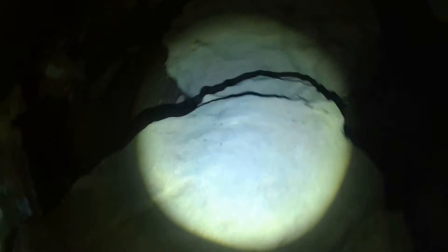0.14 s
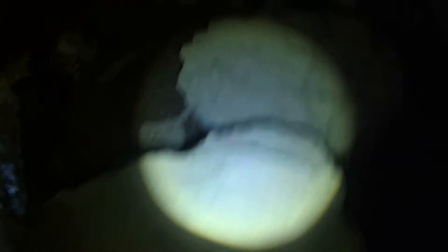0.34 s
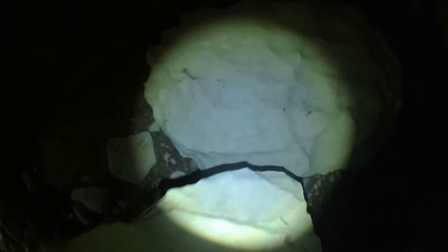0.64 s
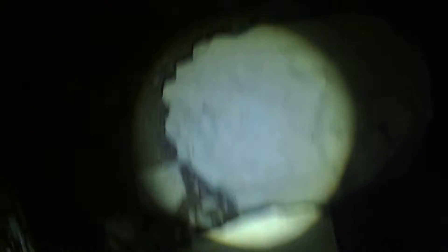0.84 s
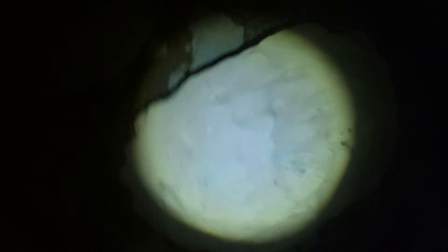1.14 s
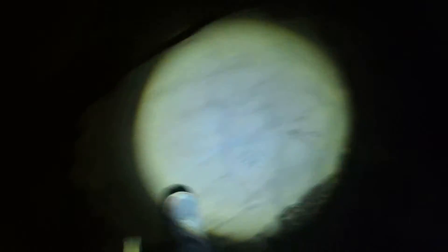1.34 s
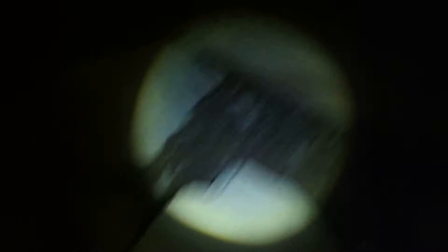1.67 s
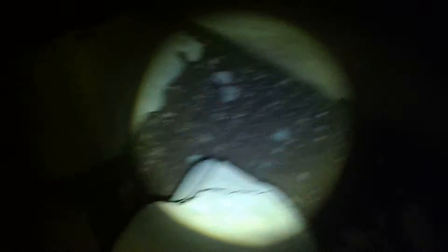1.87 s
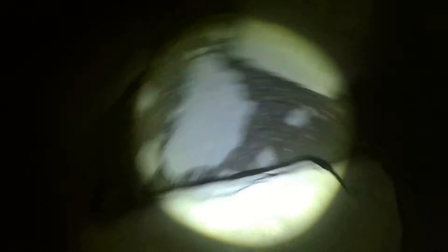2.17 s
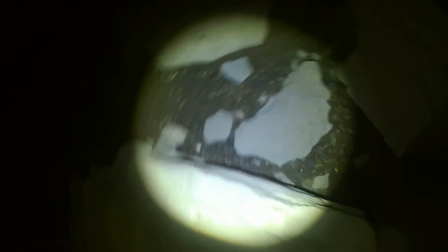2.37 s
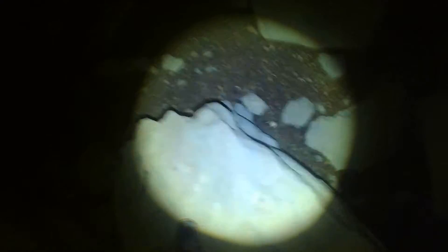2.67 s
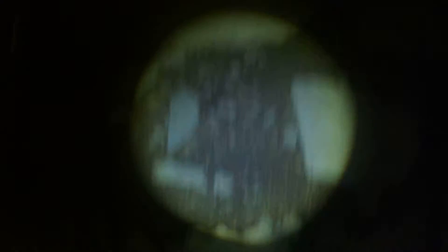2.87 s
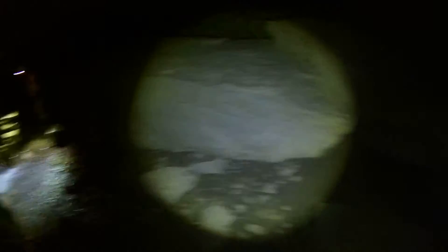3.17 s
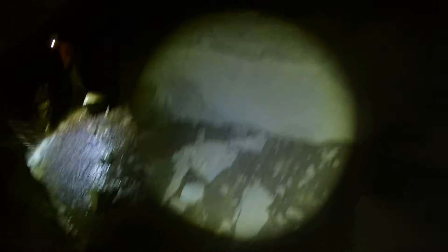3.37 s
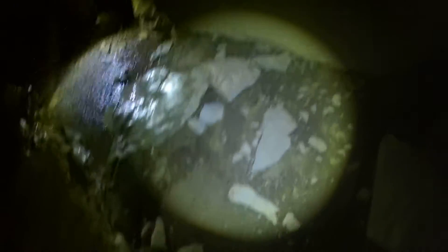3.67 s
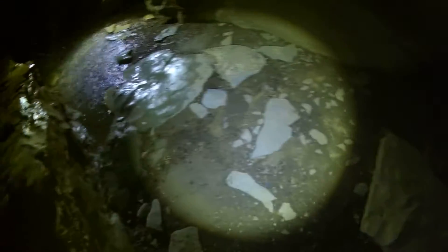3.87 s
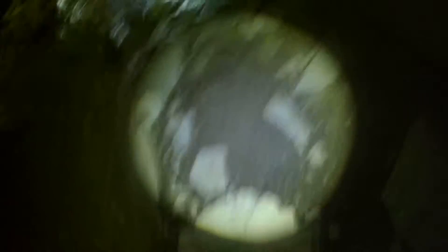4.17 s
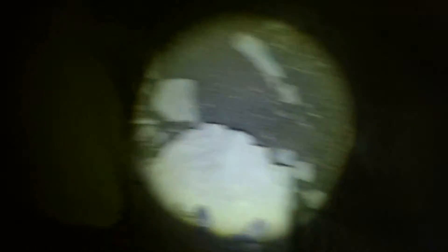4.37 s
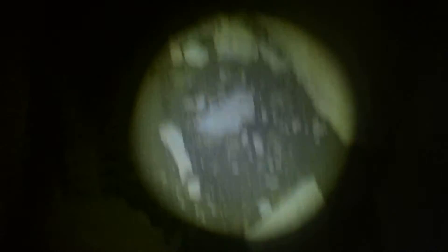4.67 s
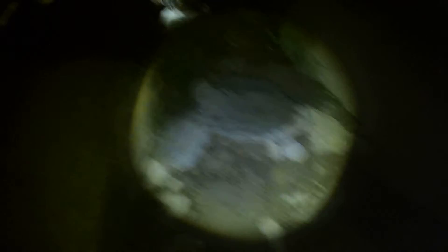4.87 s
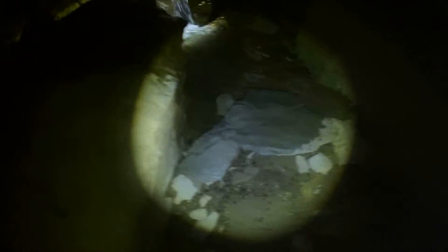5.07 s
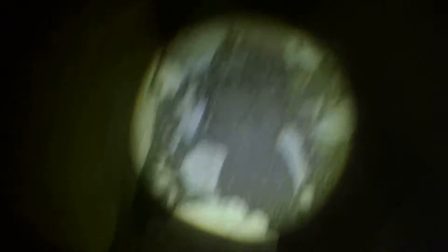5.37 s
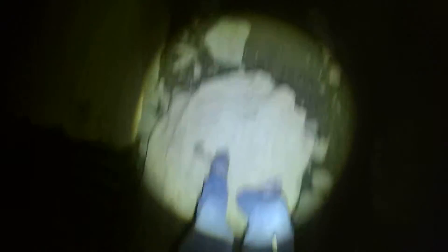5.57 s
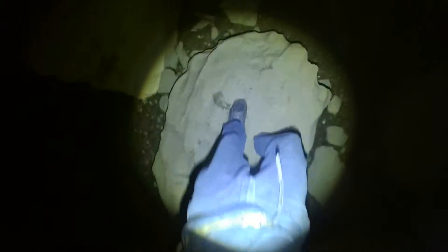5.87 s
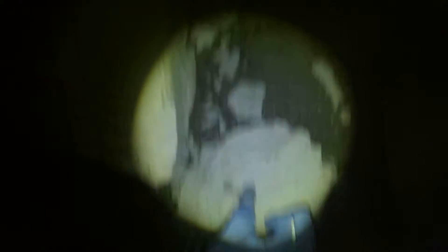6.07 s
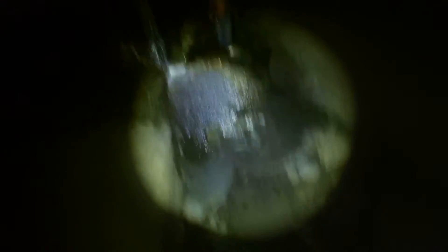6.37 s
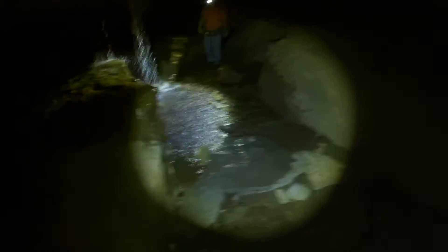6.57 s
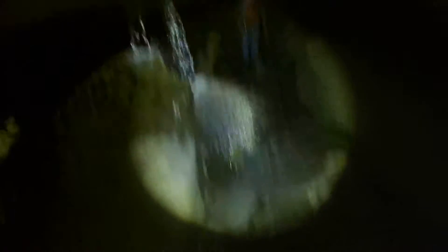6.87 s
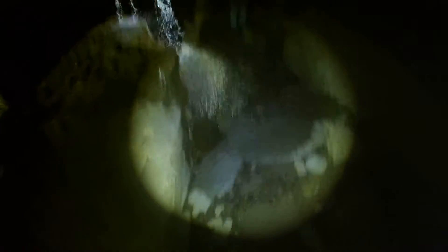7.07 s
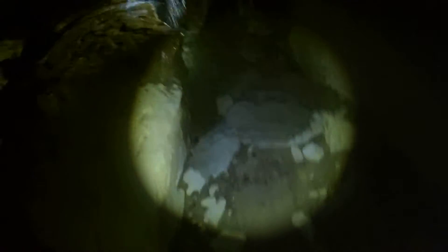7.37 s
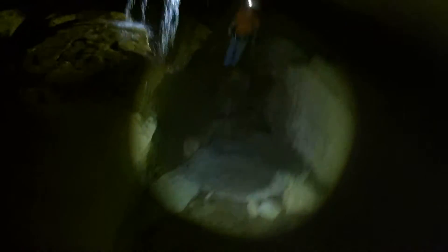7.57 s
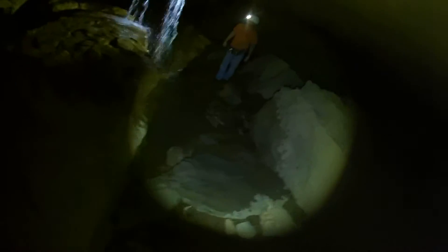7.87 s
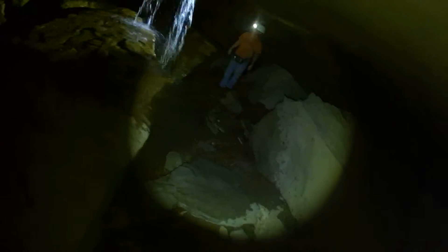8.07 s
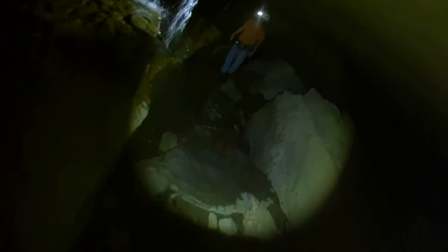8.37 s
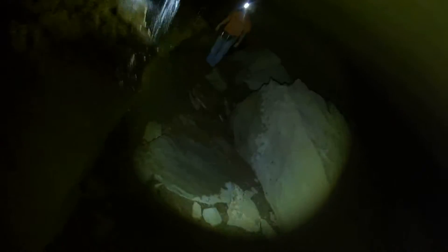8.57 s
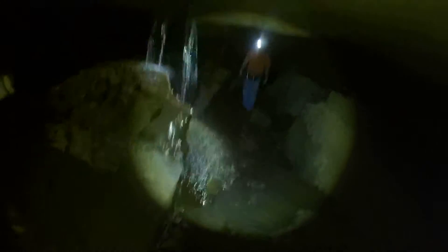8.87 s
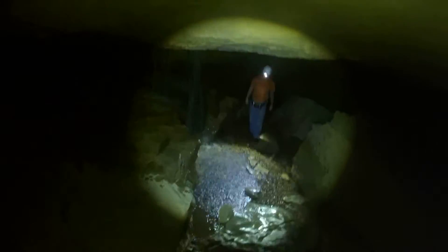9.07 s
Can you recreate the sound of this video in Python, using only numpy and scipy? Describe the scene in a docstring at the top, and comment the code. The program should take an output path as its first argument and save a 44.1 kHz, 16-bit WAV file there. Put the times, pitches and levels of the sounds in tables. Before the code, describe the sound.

Heard from inside a plastic camera case worn on the body, falling water spatters and bubbles without pause, with a little cave echo behind it. Close handling noise soon breaks in: hollow clicks, padded bumps, short scrapes, rustling straps and a low wobble from heavy steps on rock. The water grows somewhat louder and brighter midway, and the sharpest knocks land near the end. The electronics whine faintly throughout.

```python
"""In a cave, by a small waterfall splashing onto rock; the microphone is shut in a body-worn camera's plastic case.
The water comes through the shell, with the cave's echo behind it. The wearer clambers over the stones:
steps jolt the mount into a low wobble, and right at the microphone straps rustle and gear ticks, bumps
and scrapes, all ringing the same case. The electronics add a faint high whine; heavy blows duck the gain."""
import sys
import numpy as np
from scipy import signal
from scipy.fft import rfft, irfft
from scipy.io import wavfile
from scipy.ndimage import uniform_filter1d

SR = 44100
rng = np.random.default_rng(int(sys.argv[2]) if len(sys.argv) > 2 else 0)


def unload_wav(signal):
    """Save mono or channel-first audio to the path in sys.argv[1] as 16-bit WAV at rate SR, clipped to [-1, 1]."""
    wavfile.write(
        sys.argv[1],
        SR,
        np.round(np.clip(np.atleast_2d(signal).T, -1, 1) * 32767).astype(np.int16),
    )


N = 407043
T = np.arange(N) / SR

# Levels in the tables are relative; each source sets its own gain on top.
# the water as heard from inside the case: frequency_hz, level_db
WATER_SPECTRUM = [(100, -10.5), (400, -19.5), (520, -15.5), (850, -13), (1100, -12.5), (1350, -1.5),
                  (1530, -6), (1850, 0.5), (2350, -11.5), (3100, -20.5), (4700, -15.5), (5500, -24.5),
                  (8800, -39), (15500, -40.5)]
# narrow bands where the shell lets more through: centre_hz, width_hz, lift_db
SHELL_WINDOWS = [(140, 49, -1), (1270, 120, 0.5), (1650, 180, 0.5), (3720, 110, 4), (4430, 360, 3),
                 (7600, 240, 5.5)]
# how far the case is turned towards the water: time_s, facing_share (0 away, 1 head-on)
FACING_WATER = [(0, 0.18), (1.7, 0), (3.2, 0.57), (5.2, 0.97), (6.5, 0.7), (7.3, 0.9), (9.23, 0.54)]
# change of tone with the case head-on to the water: centre_hz, width_hz, lift_db
HEAD_ON_BANDS = [(2020, 950, -6), (3090, 570, 6.5), (3644, 63, 8), (4200, 91, 4)]
# spells of clambering: start_s, length_s, sway_db, rustle_db
CLAMBERING = [(0.296, 0.094, -34, -48.5), (1.495, 0.67, -34, -43), (2.251, .48, -30.5, -32.5),
              (3.442, 0.23, -32, -48), (3.989, 0.52, -24.5, -40), (5.085, 0.29, -34, -36),
              (5.4, 0.59, -39, -41.5), (6.053, .42, -31.5, -38.5), (6.471, 0.24, -22.5, -28),
              (6.774, 0.38, -37.5, -42), (7.58, 0.27, -36.5, -38), (7.877, 0.67, -32, -35.5),
              (8.6, 1, -42, -44.5)]
# rumble of the swaying mount: frequency_hz, level_db
SWAY_SPECTRUM = [(12, 0.5), (28, -4.5), (42, -6), (55, 9.5), (68, 1.5), (90, -35), (200, -34.5), (600, -87)]
# heavy steps jolting the mount: start_s, level_db, t60_s
STEP_JOLTS = [(1.55, -18.5, 0.36), (2.261, -13.5, 0.12), (4, -19.5, 0.3), (4.072, -15, .49),
              (4.299, -14.5, 0.7), (5.105, -19, 0.11), (5.211, -13, 0.52), (6.549, -10, .5),
              (7.194, -18, 0.41), (7.293, -18.5, 0.21)]
# ringing modes of the plastic case: pitch_hz, level_db, t60_s
CASE_MODES = [(153.4, -17, 0.18), (182.7, -8, 0.093), (242.7, -5, 0.075), (307.7, -6, 0.039),
              (367, -9, 0.04), (486.5, -5.5, 0.038), (667, -5, 0.032), (858, -15.5, 0.054),
              (1080, -18, 0.075), (1144, -30, 0.11), (1406, 5, 0.03), (1586, 7, 0.013), (1776, -4, 0.03),
              (1876, -6, 0.047), (2224, -13, 0.056), (2790, -56, 0.0079), (3615, -8.5, 0.018),
              (4240, -6, 0.011)]
# gear hitting the case, a hard edge with a padded weight behind it: start_s, tick_db, bump_db
GEAR_KNOCKS = [(1.545, -20.5, -17), (1.578, -27, -20.5), (1.664, -28, -25), (1.942, -18.5, -42),
               (2.4208, -20, -30), (2.468, -21, -25), (2.659, -5.5, -14.5), (3.268, -22, -17),
               (3.5, -19.5, -34), (3.997, -14, -31), (4.259, -36, -18.5), (4.448, -17, -6.5),
               (4.564, -50, -19), (5.1, -23.5, -20), (5.327, -20.5, -19), (5.354, -28, -16),
               (5.606, -24.5, -23), (6.1, -24, -18), (6.296, -25, -19.5), (6.482, -13, -13),
               (6.506, -11.5, -19), (6.5438, -12.5, -25), (6.607, -10.5, -14), (6.804, -28, -22.5),
               (7.198, -24, -21), (7.5563, -9.5, -38), (7.6233, -7, -38), (7.6877, -15, -28),
               (7.7178, -16.5, -48), (7.769, -23, -18), (7.877, -31, -19), (7.942, -8, -10.5),
               (8.188, -6.5, -18), (8.298, -27, -17.5), (8.4572, -1, -9), (8.4627, -12.5, -14.5),
               (8.809, -28, -22), (9.02, -24, -34)]
# gear sliding over the case: start_s, length_s, level_db, low_cut_hz
GEAR_SCRAPES = [(1.56, 0.039, -35, 250), (1.899, 0.089, -33, 1390), (2.001, 0.08, -38, 398),
                (2.227, 0.045, -33, 193), (2.463, 0.17, -29.5, 300), (2.645, 0.044, -26.5, 990),
                (2.701, 0.0465, -26.5, 600), (4.262, .11, -34, 200), (4.425, 0.031, -22.5, 700),
                (5.148, 0.16, -33, 1140), (6.111, 0.09, -34.5, 500), (6.469, .165, -28.5, 700),
                (7.206, 0.059, -27, 300), (7.593, 0.0354, -25, 590), (7.916, 0.17, -34.5, 300),
                (8.219, 0.15, -33, 300)]


def undb(db):
    """Decibels to gain."""
    return 10 ** (np.asarray(db) / 20)


def unit(x):
    """Scale to rms 1."""
    return x / np.sqrt(np.mean(x ** 2))


def add(track, start_s, x):
    """Mix x into the track from start_s on."""
    i = max(int(start_s * SR), 0)
    track[i:i + len(x)] += x[:max(N - i, 0)]


def colour(x, spectrum, bands=()):
    """Filter by a broad spectrum with lifted or lowered bands on top."""
    f = np.maximum(np.arange(N // 2 + 1) * SR / N, 1)
    hz, db = np.transpose(spectrum)
    shape_db = np.interp(np.log(f), np.log(hz), db)
    for centre_hz, width_hz, lift_db in bands:
        shape_db += lift_db / (1 + (2 * (f - centre_hz) / width_hz) ** 2)
    return irfft(rfft(x) * undb(shape_db), N)


def cut(x, hz, kind, order=2):
    """Butterworth low- or high-pass."""
    return signal.sosfilt(signal.butter(order, hz, kind, fs=SR, output="sos"), x)


def decay(t, t60_s):
    """A fall of 60 dB every t60_s."""
    return np.exp(-np.log(1000) * t / t60_s)


def swell(t, peak_s):
    """A quick rise to 1 at peak_s and a slower fall."""
    return t / peak_s * np.exp(1 - t / peak_s)


def wander(rate_hz):
    """Glide from one random value to the next, at rms 1."""
    hold = int(SR / rate_hz)
    steps = np.repeat(rng.standard_normal(N // hold + 1), hold)
    return unit(uniform_filter1d(steps, hold)[:N])


def grains(per_s, spread_db):
    """Random clicks; a positive spread makes a few louder, a negative one a few softer."""
    size = undb(spread_db * np.minimum(rng.exponential(size=N), 5))
    return unit((rng.random(N) < per_s / SR) * rng.standard_normal(N) * size)


def bubbles(count=3600, low_hz=900, high_hz=5000, cycles=14, glide=0.074, spread_db=3):
    """Air trapped in the pool rings briefly and rises in pitch."""
    out = np.zeros(N)
    for when, pitch, size in rng.random((count, 3)):
        hz = low_hz * (high_hz / low_hz) ** pitch
        turns = T[:int(2 * cycles * SR / hz)] * hz
        age = turns / cycles
        ring = np.exp(-2 * age) * np.sin(2 * np.pi * turns * (1 + glide * age))
        add(out, when * N / SR, undb(-spread_db * np.log(size + 0.01)) * ring)
    return unit(out)


def waterfall(bubble_db=-10, cave_db=-5, cave_t60_s=0.94, flutter_db=1.5, wash_db=-1):
    """Drops spatter on rock and bubble in the pool over an even wash; the cave smears the splashes."""
    spatter = grains(per_s=5000, spread_db=-0.5) * undb(flutter_db * wander(rate_hz=18))
    splash = spatter + undb(bubble_db) * bubbles()
    cave_tail = rng.standard_normal(SR) * decay(T[:SR], cave_t60_s)
    echo = unit(irfft(rfft(splash) * rfft(cave_tail, N), N))
    return splash + undb(cave_db) * echo + undb(wash_db) * rng.standard_normal(N)


def through_case(water, away_db=-39.5, head_on_lift_db=3, dip_at_s=2.29, dip_s=0.025, dip_db=-18):
    """The case dulls the water; its front passes more spray than its sides. The level dips once, briefly."""
    side = colour(water, WATER_SPECTRUM, SHELL_WINDOWS)
    front = colour(water, WATER_SPECTRUM, SHELL_WINDOWS + HEAD_ON_BANDS)
    facing = np.interp(T, *np.transpose(FACING_WATER))
    heard = (side + facing * (front - side)) / np.std(side)
    dip = np.zeros(N)
    add(dip, dip_at_s, signal.windows.tukey(int(dip_s * SR), 0.5))
    return heard * undb(away_db + head_on_lift_db * facing + dip_db * dip)


def whine(pitch_hz=13240, level_db=-76.5, waver_hz=40):
    """The camera's electronics whine faintly, even in level and slightly unsteady in pitch."""
    hz = pitch_hz + waver_hz * wander(rate_hz=150)
    return undb(level_db) * unit(np.sin(2 * np.pi * np.cumsum(hz) / SR))


def effort(noise, rest_db, attack_s=0.027, release_s=0.034):
    """Gain of the "sway" or "rustle": each spell of clambering sets in, holds and falls back to rest."""
    gain = np.full(N, undb(rest_db))
    for start_s, length_s, sway_db, rustle_db in CLAMBERING:
        spell = np.interp(T - start_s, [-attack_s, 0, length_s, length_s + release_s], [0, 1, 1, 0])
        gain = np.maximum(gain, spell * undb({"sway": sway_db, "rustle": rustle_db}[noise]))
    return gain


def mount(wobble_hz=57.2, jolt_gain_db=1, rise_s=0.0061):
    """The camera sways on its mount all the time and wobbles freely after each heavy step."""
    out = unit(colour(rng.standard_normal(N), SWAY_SPECTRUM)) * effort("sway", rest_db=-40)
    t = T[:SR // 2]
    for start_s, level_db, t60_s in STEP_JOLTS:
        swing = (1 - np.exp(-t / rise_s)) * decay(t, t60_s)
        wobble = swing / swing.max() * np.sin(2 * np.pi * wobble_hz * t)
        add(out, start_s, undb(level_db + jolt_gain_db) * wobble)
    return out


def shell(force, dull_hz=3300):
    """The case rings around the microphone, its modes mixed by where it is touched; plastic dulls the top."""
    t = T[:SR // 6]
    touch_db = rng.uniform(-3, 3, len(CASE_MODES))
    ring = sum(undb(level_db + lift_db) * np.sin(2 * np.pi * hz * t) * decay(t, t60_s)
               for (hz, level_db, t60_s), lift_db in zip(CASE_MODES, touch_db))
    return cut(signal.fftconvolve(force, ring)[:N], dull_hz, "low", order=3)


def straps(low_hz=150, soft_hz=320, uneven_db=2, rattle_db=-6, rattle_hz=700, rattle_limit_db=-46):
    """Cloth and straps nudge the case softly and rattle lightly, as hard as the wearer moves."""
    moving = effort("rustle", rest_db=-58)
    nudges = grains(per_s=400, spread_db=1) * undb(uneven_db * wander(rate_hz=24))
    rustle = unit(cut(cut(shell(nudges), soft_hz, "low"), low_hz, "high"))
    taps = shell(grains(per_s=50, spread_db=0), dull_hz=2600)
    rattle = unit(cut(taps, rattle_hz, "high", order=1))
    rattle_gain = np.minimum(undb(rattle_db) * moving, undb(rattle_limit_db))
    return moving * rustle + rattle_gain * rattle


def ticks(gain_db=-7, chatter=0.11, chatter_peak_s=0.00255, rebound=0.73, rebound_s=0.00221,
          low_cut_hz=560, top_hz=2800, bright_hz_per_db=25):
    """A hard edge strikes the case, rebounds and chatters for milliseconds; harder hits are brighter."""
    out, t = np.zeros(N), T[:SR // 25]
    for start_s, tick_db, _ in GEAR_KNOCKS:
        force = chatter * rng.standard_normal(len(t)) * swell(t, chatter_peak_s)
        force[0] += 1
        force[int(rebound_s * SR * rng.uniform(0.8, 1.2))] += rebound
        ring = shell(force, dull_hz=top_hz + bright_hz_per_db * tick_db)
        tick = cut(ring, low_cut_hz, "high", order=1)
        add(out, start_s, undb(tick_db + gain_db) * tick / np.std(tick[:SR // 100]))
    return out


def bumps(gain_db=1.5, contact_at_s=0.00311, crumple=0.049, crumple_peak_s=0.0054,
          low_cut_hz=100, top_hz=500, stiffen=0.17):
    """A padded weight pushes for longer, so mostly low modes answer; hard blows stiffen the padding."""
    out, t = np.zeros(N), T[:SR // 15]
    for start_s, _, bump_db in GEAR_KNOCKS:
        force = crumple * rng.standard_normal(len(t)) * swell(t, crumple_peak_s)
        force[int(contact_at_s * SR)] += 1
        padded = cut(shell(force), top_hz * undb(stiffen * bump_db), "low", order=3)
        bump = cut(padded, low_cut_hz, "high")
        add(out, start_s, undb(bump_db + gain_db) * bump / np.abs(bump).max())
    return out


def scrapes(fade_s=0.0067, uneven_db=2):
    """Gear sticks and slips across the case; the dense little catches ring the shell."""
    out = np.zeros(N)
    catches = grains(per_s=2500, spread_db=-2.5) * undb(uneven_db * wander(rate_hz=61))
    for start_s, length_s, level_db, low_cut_hz in GEAR_SCRAPES:
        t = T[:int(length_s * SR)]
        pressure = np.clip(np.minimum(t, length_s - t) / fade_s, 0, 1)
        force = pressure * catches[int(start_s * SR):][:len(t)]
        rub = cut(shell(force), low_cut_hz, "high")
        add(out, start_s, undb(level_db) * rub / np.std(rub[:len(t)]))
    return out


def gain_control(x, threshold_db=-19.5, slope=0.55, bass_hz=600, sense_s=0.015, lag_s=0.025,
                 recover_db_per_s=16):
    """Heavy, bass-laden blows turn the camera's gain down a little late; it creeps back afterwards."""
    share = 1 / (sense_s * SR)
    bass_power = signal.lfilter([share], [1, share - 1], cut(x[0], bass_hz, "low") ** 2)
    late_level_db = np.interp(T - lag_s, T, 10 * np.log10(bass_power + 1e-12))
    duck_db = slope * np.maximum(late_level_db - threshold_db, 0)
    recovered_db = recover_db_per_s * T
    return x * undb(recovered_db - np.maximum.accumulate(duck_db + recovered_db))


def scene():
    """Water out in the cave, handling right on the case, one microphone inside."""
    water = through_case(waterfall())
    handling = ticks() + bumps() + scrapes() + straps() + mount()
    return (water + handling + whine())[None]


def record(dry, overload=0.72, top_hz=15800):
    """The hardest knocks overload the camera's input and duck its gain; the extreme treble is cut."""
    ducked = gain_control(np.clip(dry, -overload, overload))
    return signal.sosfilt(signal.ellip(8, 0.2, 70, top_hz, fs=SR, output="sos"), ducked)


dry = scene()
out = record(dry)
unload_wav(out)
```